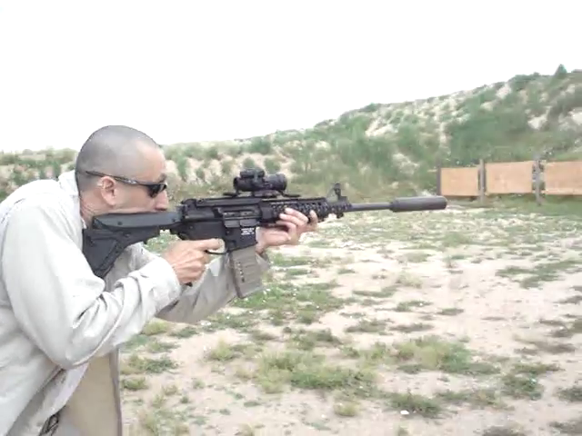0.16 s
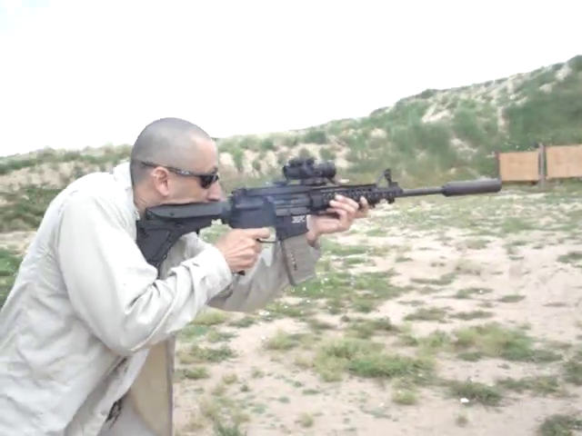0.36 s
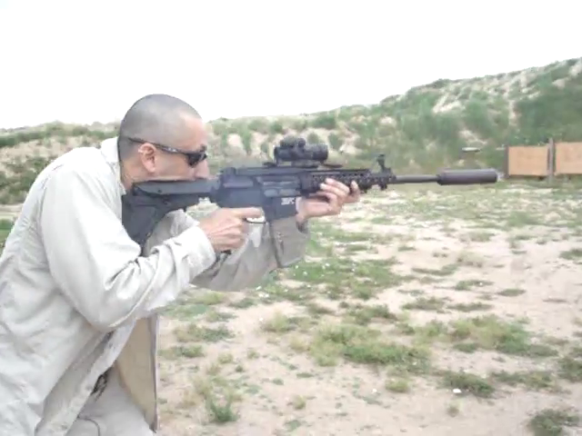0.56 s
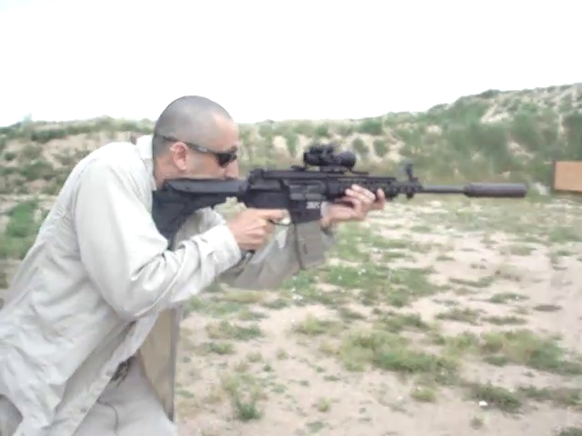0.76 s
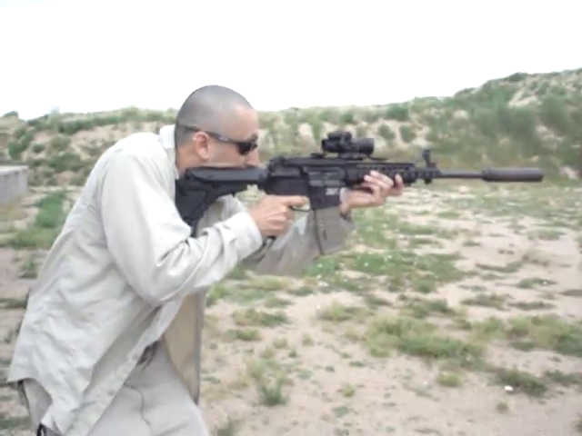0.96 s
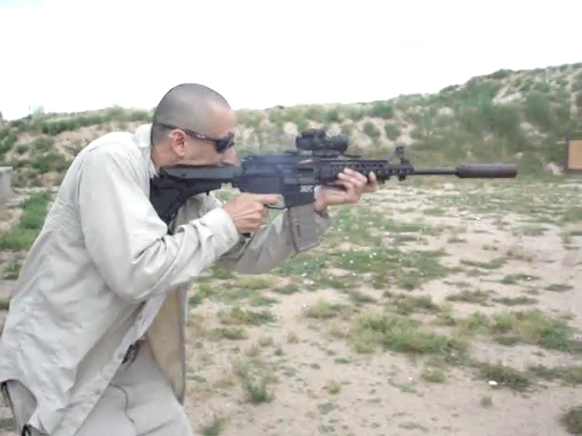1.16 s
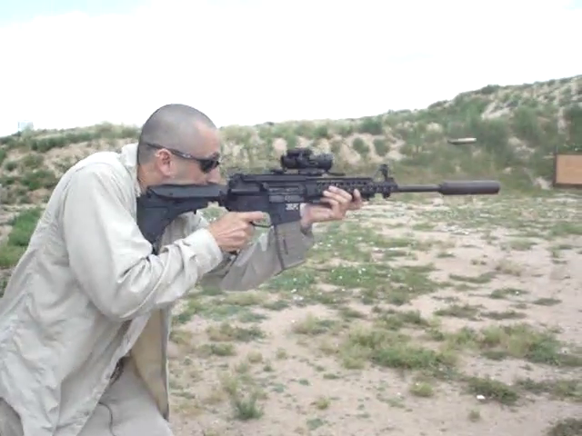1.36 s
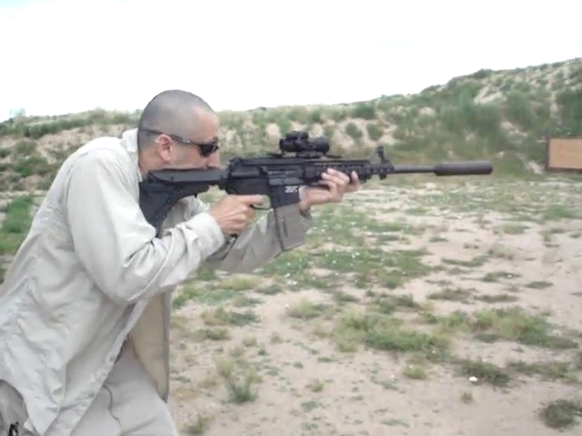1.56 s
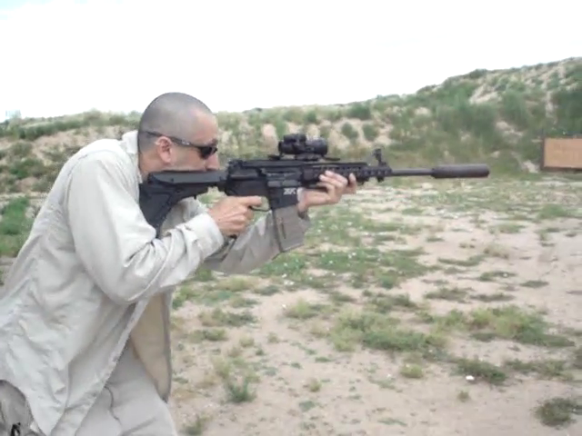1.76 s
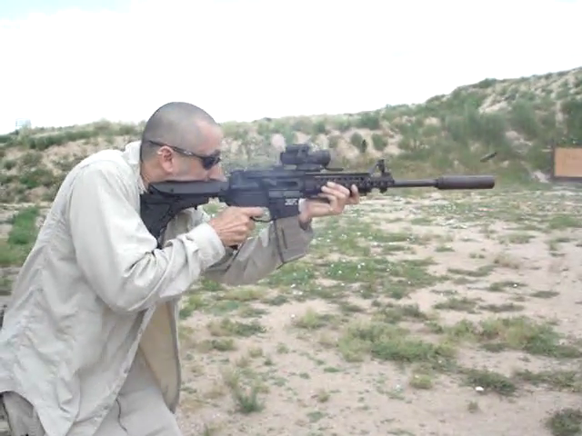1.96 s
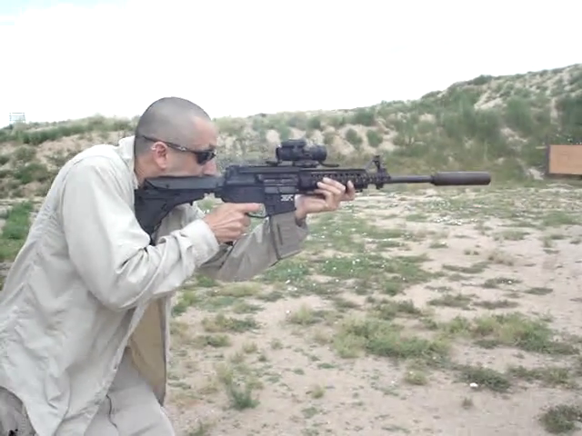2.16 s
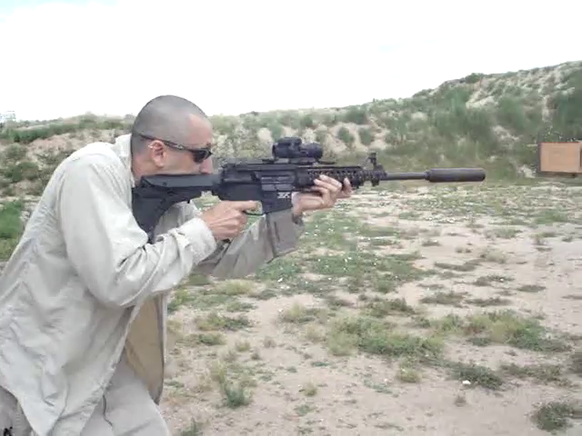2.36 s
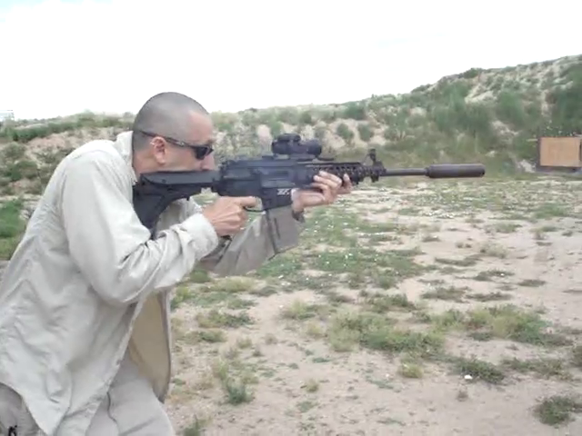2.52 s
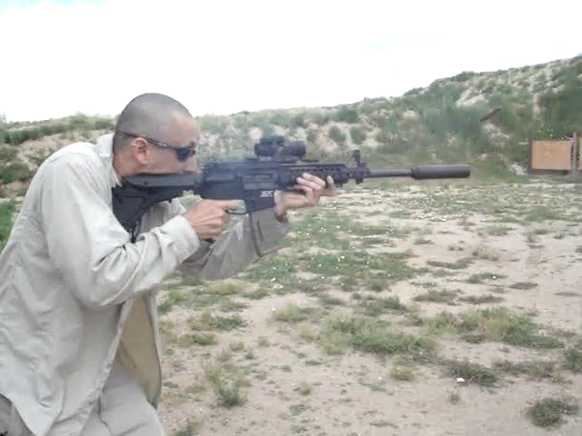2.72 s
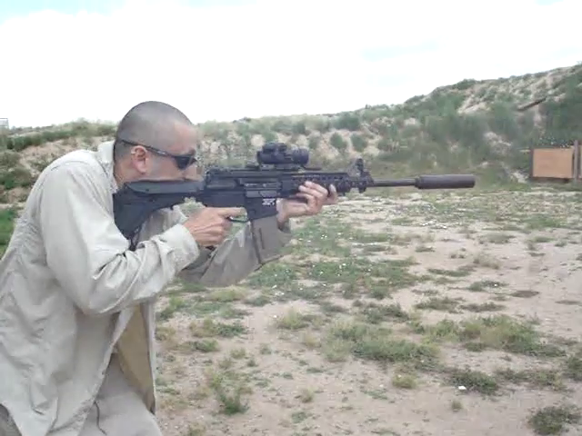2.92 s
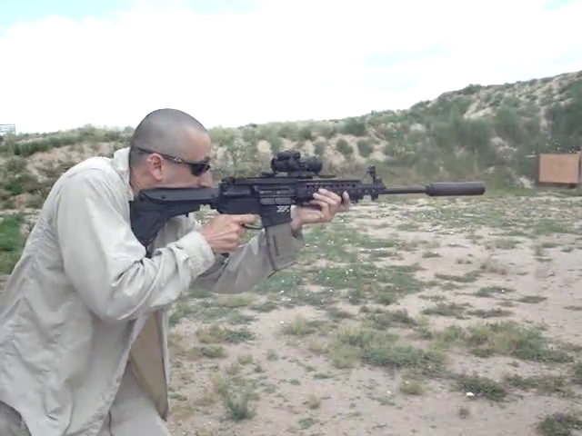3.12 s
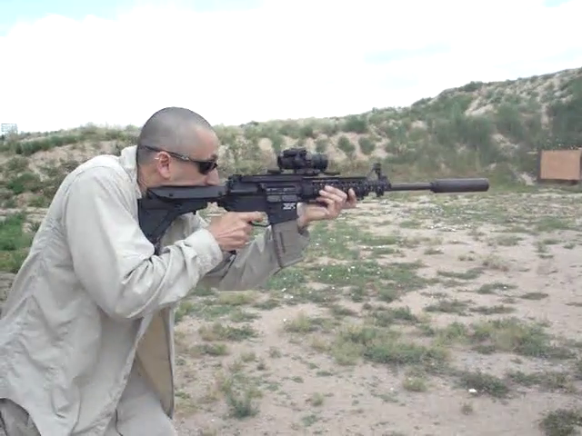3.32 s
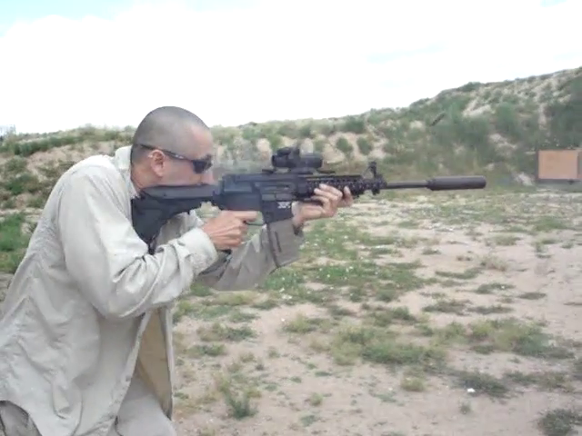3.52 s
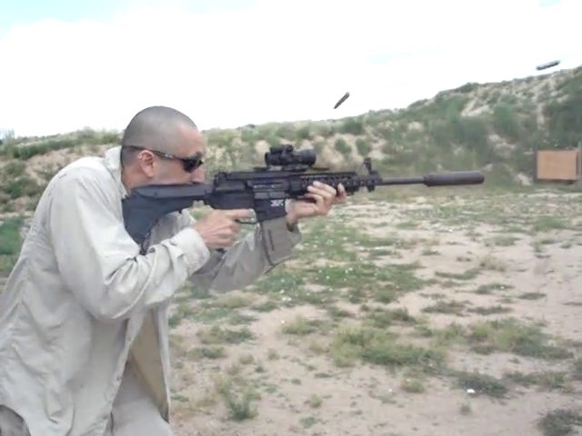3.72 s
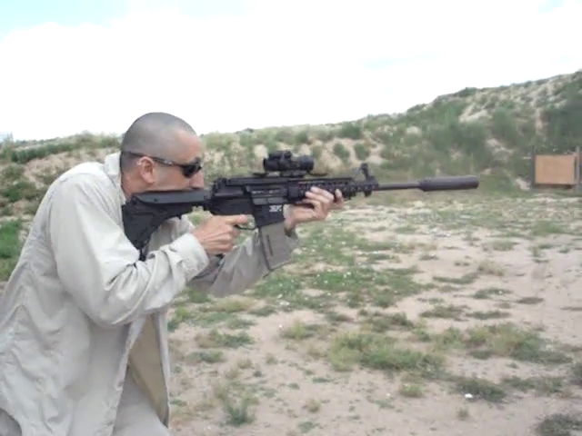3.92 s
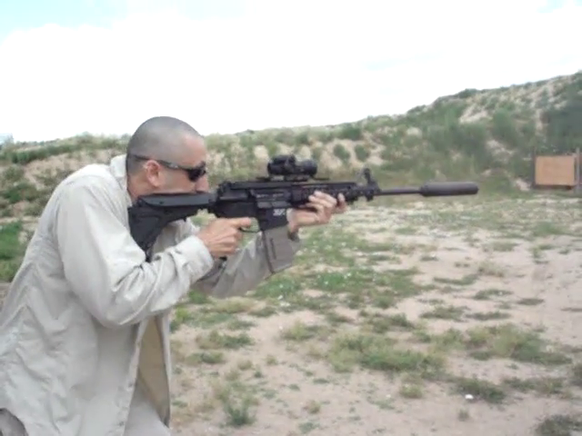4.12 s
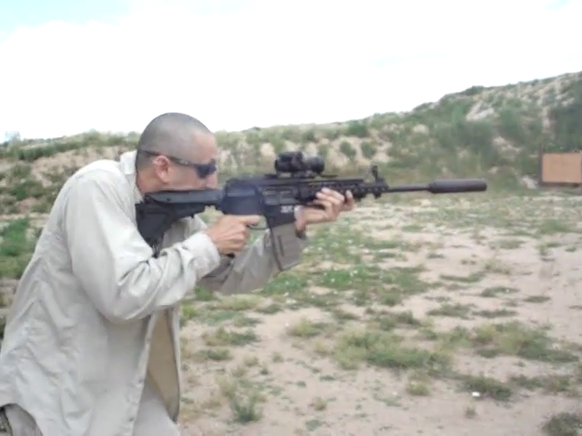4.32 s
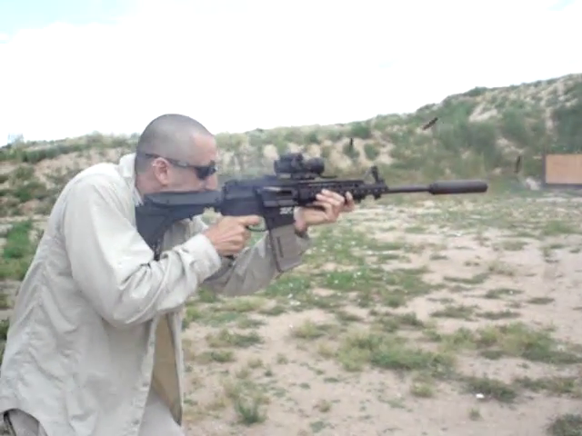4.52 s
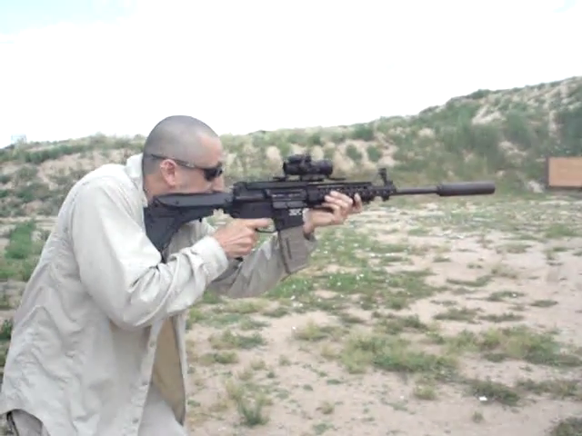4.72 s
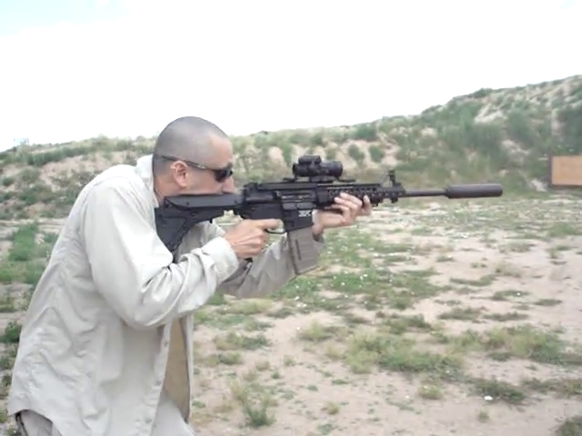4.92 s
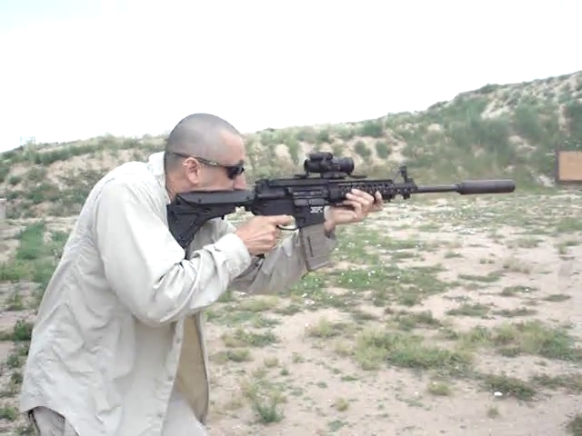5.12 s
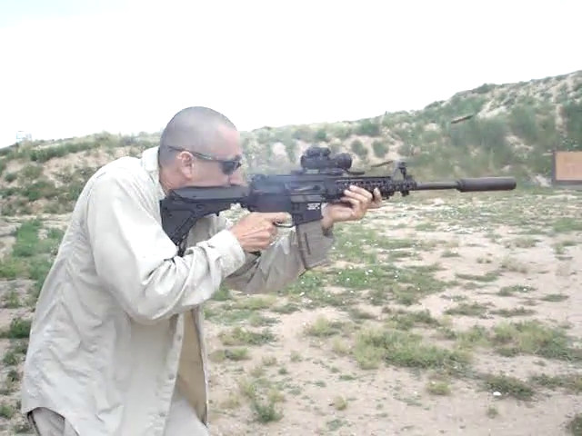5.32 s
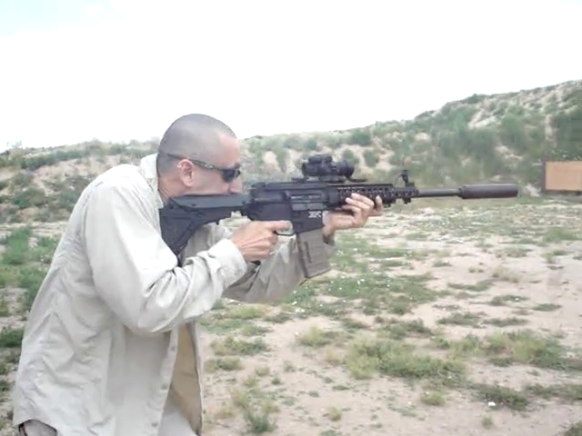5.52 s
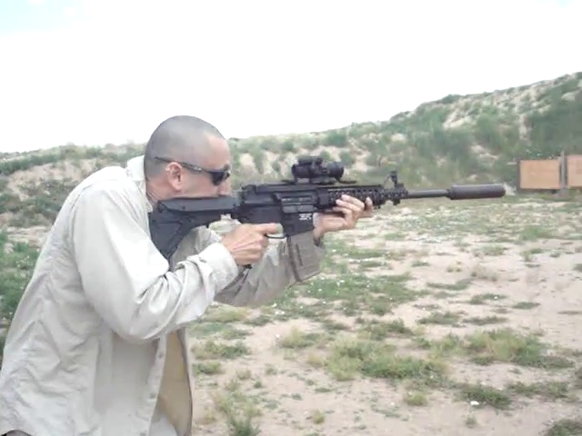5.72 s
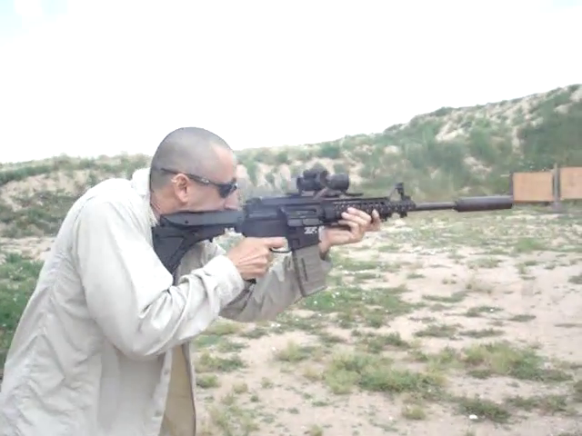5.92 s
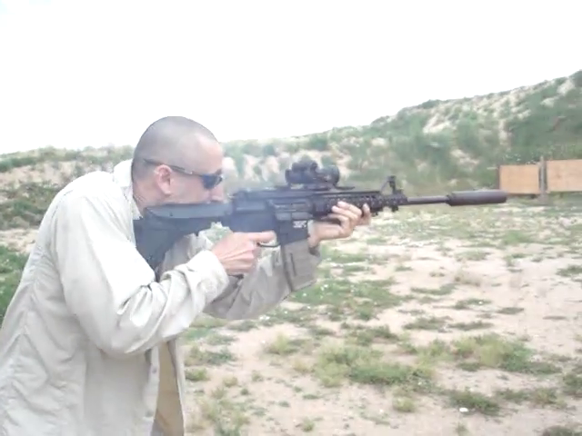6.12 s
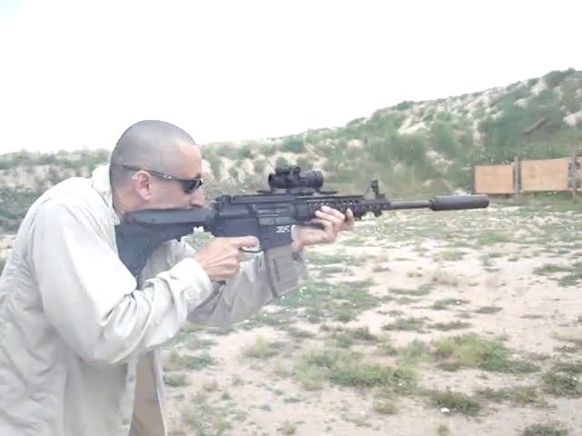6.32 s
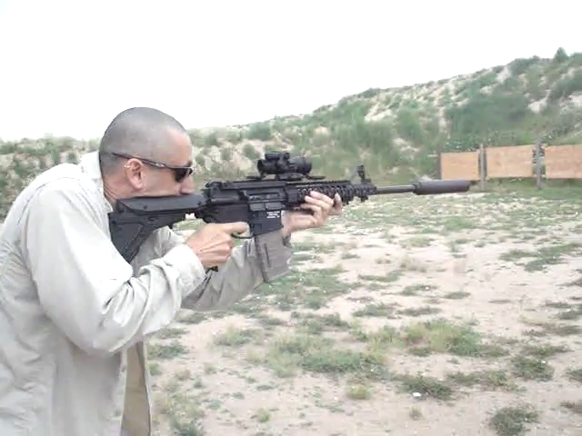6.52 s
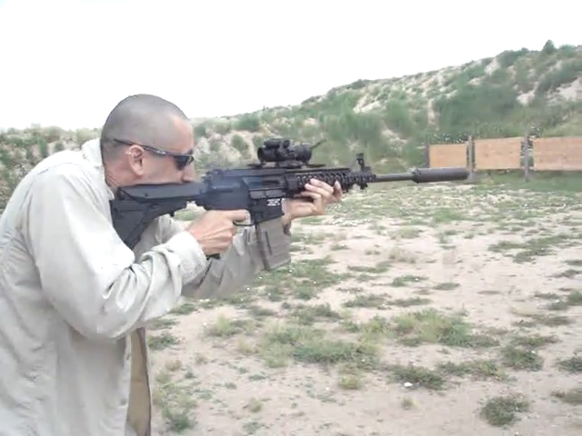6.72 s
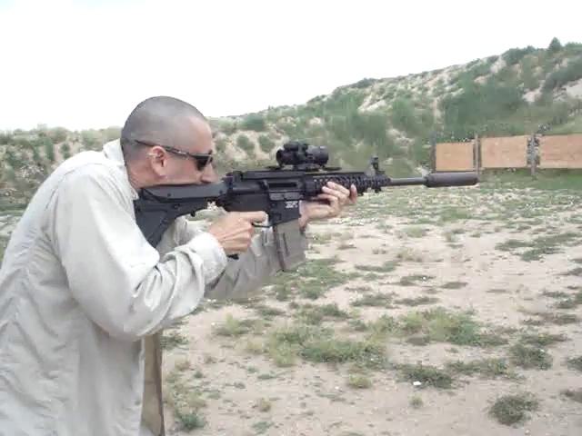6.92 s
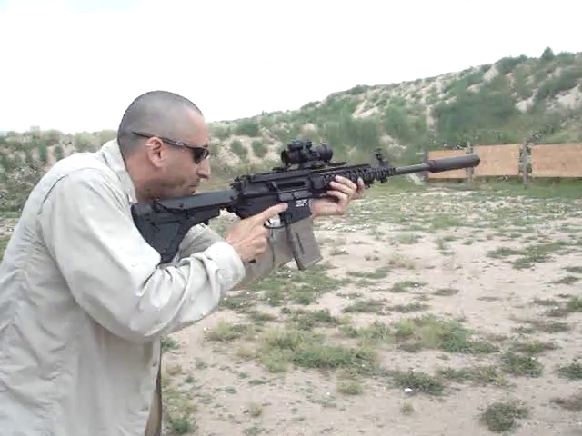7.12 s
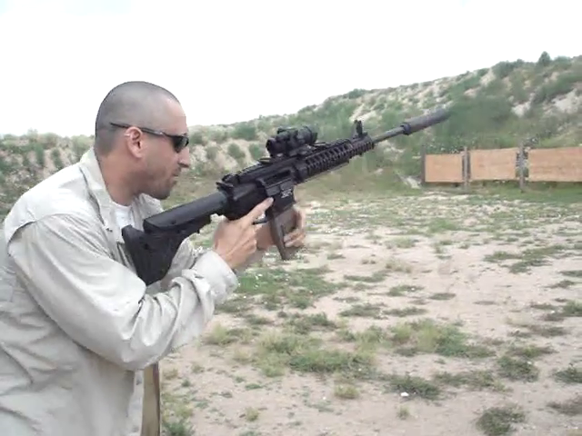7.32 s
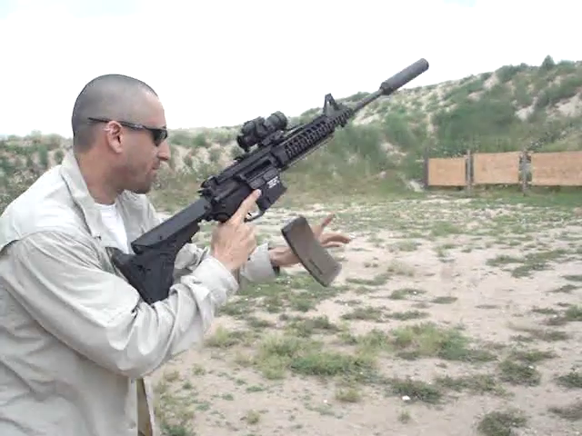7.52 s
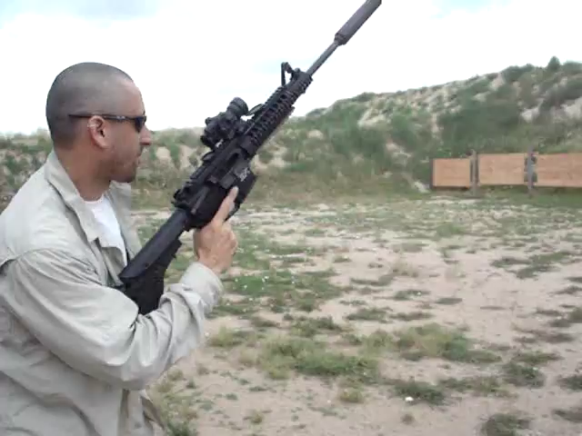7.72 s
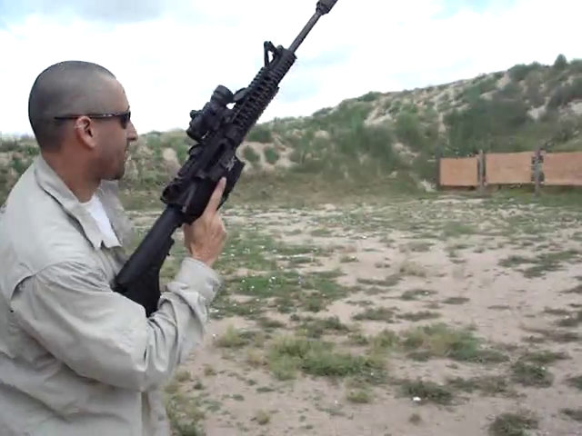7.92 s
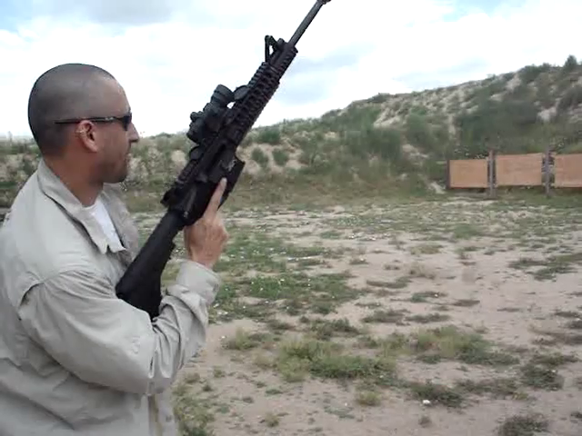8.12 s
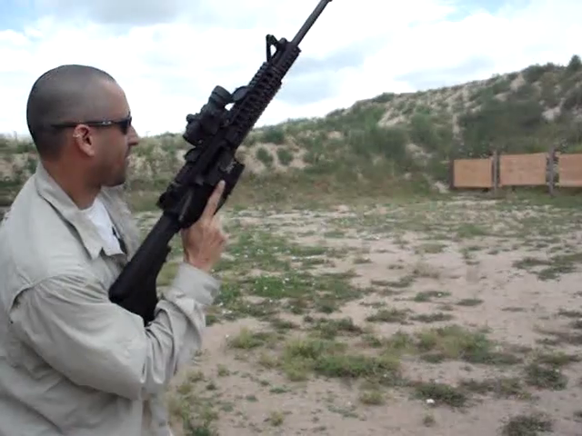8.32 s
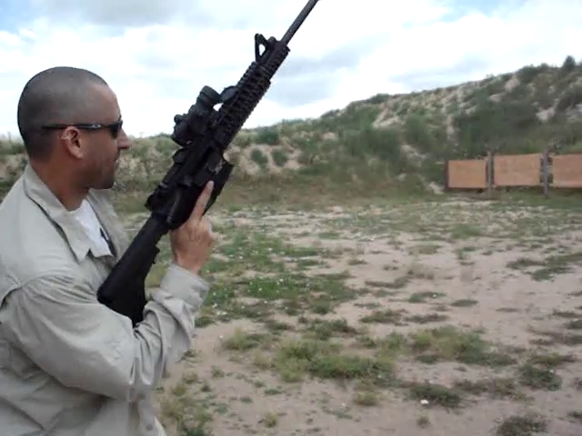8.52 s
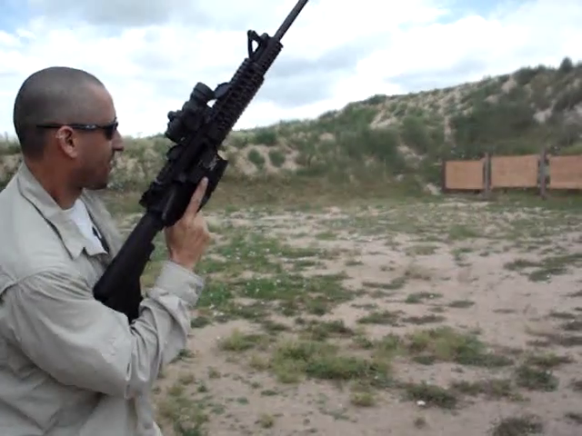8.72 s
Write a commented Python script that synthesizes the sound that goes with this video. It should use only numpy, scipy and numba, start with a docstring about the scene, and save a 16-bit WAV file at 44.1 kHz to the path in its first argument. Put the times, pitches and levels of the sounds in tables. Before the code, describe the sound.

Quick bursts of muffled but sharp rifle fire crack and echo off earth banks, followed by a loud metallic clack and wind buffeting.

```python
"""A suppressed automatic rifle on an open range with earth banks, heard from a few metres away. First the wind
stirs, gear rattles and the hammer clicks. Short bursts follow: each shot is wave packets and filtered gas
noise, then posts and boards return cracks, banks return scattered noise and the bolt slams home as a noise
burst. Between bursts a low rumble and rustle swell and cut off abruptly. After the last round the magazine
drops and a lever clacks (ringing modes, noise bursts), and gusts thump the microphone."""
import sys
import numpy as np
from scipy import signal
from scipy.fft import rfft, irfft
from scipy.io import wavfile
from scipy.ndimage import uniform_filter1d
from numba import njit

SR = 44100
rng = np.random.default_rng(int(sys.argv[2]) if len(sys.argv) > 2 else 0)


def store_pcm(level_fs):
    """Save levels as 16-bit WAV."""
    pcm = np.round(np.clip(level_fs, -1, 1) * 32767).astype(np.int16)
    wavfile.write(sys.argv[1], SR, np.atleast_2d(pcm).T)


def gain_from_db(level_db):
    """Convert decibel levels to linear amplitude factors (20 dB per decade)."""
    decades = np.asarray(level_db, float) / 20
    return 10 ** decades


N = 390726


def level(x, db):
    """Root-mean-square scaling: normalise to rms 1, then apply a level, constant or varying."""
    return x * gain_from_db(db) / np.sqrt(np.mean(x ** 2))


def band(x, hz, width):
    """Second-order resonance with unit gain at its centre."""
    return signal.lfilter(*signal.iirpeak(hz, hz / width, SR), x)


def coloured(points):
    """Spectral shaping: white noise weighted by a curve of (f/Hz, relative level/dB), rms 1."""
    hz, db = np.transpose(points)
    f = np.maximum(np.arange(N // 2 + 1) * SR / N, 1)
    weight = gain_from_db(np.interp(np.log(f), np.log(hz), db))
    return level(irfft(rfft(rng.standard_normal(N)) * weight, N), 0)


def drift(size):
    """Random modulation: a moving average of white noise over size samples, rms 1."""
    return level(uniform_filter1d(rng.standard_normal(N), size=size), 0)


def add(out, s, sound):
    """Superposition: mix a sound in at a time in seconds."""
    i = int(s * SR)
    out[i:i + len(sound)] += sound[:N - i]


def blip(hz, cycles, turn):
    """Gaussian wave packet of a few cycles, centred 10 ms in, envelope peak 1; turn is its phase."""
    t = np.arange(int(.02 * SR)) / SR - .01
    return np.exp(-(2.8 * t * hz / cycles) ** 2) * np.cos(2 * np.pi * (hz * t + turn))


def knock(hz, width, t60, rise):
    """Impact noise: a narrowed noise burst with exponential decay, peak 1."""
    t = np.arange(int((rise + t60) * SR)) / SR
    noise = band(band(rng.standard_normal(len(t)), hz, width), hz, width)
    y = noise * np.minimum(t / rise, 1) ** 2 * gain_from_db(-60 * np.maximum(t - rise, 0) / t60)
    return y / np.abs(y).max()


# spectrum of the steady hiss: (f/Hz, relative level/dB)
HISS_SPECTRUM = [(180, -58), (300, -22), (2710, -6), (2920, -5.5), (7570, -5.5), (10000, -8),
                 (13000, -38.5), (22000, -120)]


def hiss():
    """Stationary noise: a steady hiss of fixed spectrum."""
    return gain_from_db(-62.5) * coloured(HISS_SPECTRUM)


# course of the wind: (t/s, rumble level/dB, rustle level/dB)
WIND_COURSE = [(0, -60, -49), (.26, -55, -43), (.4, -51.5, -49), (.7, -73, -66), (1.1, -65.5, -64),
               (1.6, -87, -80), (7.37, -88, -84), (7.39, -69, -74), (8.0, -58, -66), (8.1, -51, -56),
               (8.5, -41, -58), (8.72, -45.5, -60), (8.86, -33, -46)]
# low swells between bursts that cut off abruptly: (cut-off t/s, rumble level/dB, rustle level/dB)
LULL_SWELLS = [(1.9, -86, -68), (2.32, -79.5, -75), (3.02, -75, -73), (3.29, -71, -64), (3.92, -71.5, -75),
               (4.21, -71, -64.5), (4.78, -72, -73), (5.07, -66, -63), (5.97, -71.5, -69), (6.53, -76, -72),
               (7.07, -68.5, -71.5)]


def layer_envelope(column, rise_db_s):
    """Envelope law: a noise layer follows the wind curve or whichever swell stands above it."""
    t = np.arange(N) / SR
    db = np.interp(t, [row[0] for row in WIND_COURSE], [row[column] for row in WIND_COURSE])
    for row in LULL_SWELLS:
        rise = rise_db_s * (t - row[0])
        cut = 15 * (row[0] - t) / .02  # falls 15 dB in 20 ms
        db = np.maximum(db, row[column] + np.minimum(rise, cut))
    return gain_from_db(db)


def wind():
    """A lumpy low rumble and a soft rustle, each noise under its own envelope: the wind and the swells between
    bursts."""
    smooth = uniform_filter1d(uniform_filter1d(rng.standard_normal(N), size=1500), size=1500)
    lumps = gain_from_db(3.0 * level(smooth, 0))
    rumble = coloured([(15, -7), (35, -5), (90, -4), (150, -9.5), (400, -20.5), (1000, -48)])
    rustle = coloured([(80, -16), (250, 2.5), (1200, -4), (3000, -11.5), (6000, -23.5)])
    out = layer_envelope(column=1, rise_db_s=35) * level(lumps * rumble, 0)
    return out + layer_envelope(column=2, rise_db_s=30) * rustle


# strongest gust thumps on the microphone: (t/s, packet peak level/dB before the low-pass, centre f/Hz)
GUST_THUMPS = [(8.11, -30.5, 230), (8.218, -27, 220), (8.356, -15, 510), (8.371, -18, 430),
               (8.393, -25, 255), (8.405, -26, 270), (8.489, -21, 340), (8.507, -21.5, 310),
               (8.512, -18.5, 260), (8.534, -26, 270), (8.571, -24, 320), (8.588, -22.5, 250),
               (8.6, -21, 240), (8.613, -25, 260), (8.641, -24, 240), (8.677, -28.5, 190),
               (8.743, -27.5, 200), (8.777, -22.5, 147), (8.824, -14, 210), (8.836, -6, 171),
               (8.851, -18, 160)]


def thumps():
    """Eddy impact: each eddy is a low wave packet with a faint higher one and a ragged noise wake."""
    out = np.zeros(N)
    first_s = 8.12  # weaker eddies come at random from here on
    eddies = []
    for when, size, pitch in rng.random(size=(28, 3)):
        eddies.append((first_s + (N / SR - first_s) * when, -32 - 9.0 * size, 200 * 1.8 ** (pitch - .5)))
    for s, db, hz in GUST_THUMPS + eddies:
        turn = rng.random()
        packet = blip(hz, 1.68, turn) + 0.16 * blip(2.26 * hz, 2.6, turn)
        add(out, s - .01, gain_from_db(db) * packet)
        wake = knock(.9 * hz, 1.7 * hz, .06, 0.005)
        add(out, s - .004, gain_from_db(db - 8.0) * wake)
    return signal.sosfilt(signal.butter(2, 1100, fs=SR, output="sos"), out)


# rattles of sling, magazine and lever: (t/s, centre f/Hz, filter width/Hz, peak level/dB, t60/s)
GEAR_RATTLES = [(0.054, 880, 810, -43, .036), (.062, 1000, 900, -40, .04), (.07, 1153, 400, -47.5, .27),
                (.325, 1296, 1700, -57, .089), (3.401, 1500, 2520, -57, .02), (7.385, 2500, 3990, -49, .2),
                (7.394, 1220, 400, -41.5, .12), (7.421, 1250, 400, -44, .08), (7.431, 1200, 500, -42, .12),
                (7.437, 2500, 4000, -41, .06), (7.444, 1900, 2000, -41, .04),
                (7.488, 2000, 2970, -40, .046), (7.528, 1300, 600, -50, .25), (7.562, 2200, 2500, -49, .12),
                (7.83, 700, 905, -49, .18), (7.982, 2970, 4980, -15.5, .085),
                (7.999, 3350, 6000, -12.5, .068), (8.005, 1500, 1300, -25, .18),
                (8.167, 2000, 5000, -40.5, .11), (8.199, 3000, 6000, -33.5, .092)]


def rattles():
    """Impact noise of loose gear: band-limited bursts with individual decay times."""
    out = np.zeros(N)
    for s, hz, width, db, t60 in GEAR_RATTLES:
        add(out, s, gain_from_db(db) * knock(hz, width, t60, 0.019 * t60))
    return out


# modes of the rifle: (nominal f/Hz, relative level/dB at full hardness, t60/s)
RIFLE_MODES = [(720, -10, .03), (1020, -18.5, .035), (1200, 4.5, .03), (1320, -9.5, .06), (2420, -1.5, .04),
               (2930, -9.5, 0.049), (3670, -13, .04), (5000, -14, 0.035), (6450, -17.5, .04)]


def ring(hardness):
    """Modal superposition: decaying sines after a blow; a soft blow leaves the high modes quiet."""
    t = np.arange(int(.2 * SR)) / SR
    y = np.zeros(len(t))
    for hz, db, t60 in RIFLE_MODES:
        softening = 9.0 * (1 - hardness) * np.log2(hz / 1200)
        detune = 1 + 0.056 * rng.standard_normal()
        y += gain_from_db(db - softening - 60 * t / t60) * np.sin(2 * np.pi * hz * t * detune)
    y = y * np.minimum(t / 0.00036, 1)
    return y / np.abs(y).max()


# blows that ring the rifle: (t/s, peak level/dB, hardness 0-1)
RIFLE_BLOWS = [(0.054, -48, 0), (.062, -32, .2), (.111, -50.5, 0), (.325, -51.5, 0), (7.488, -45, .5),
               (7.541, -52, .4), (7.982, -23.5, .6), (7.999, -11, 1), (8.199, -38.5, .5)]


def blows():
    """Impulsive excitation: every blow sets the rifle's modes ringing."""
    out = np.zeros(N)
    for s, db, hardness in RIFLE_BLOWS:
        add(out, s, gain_from_db(db) * ring(hardness))
    return out


# trigger and hammer at the start of a burst: (t/s, peak level/dB)
HAMMER_CLICKS = [(0.3716, -36), (0.396, -27), (1.12, -35), (1.903, -31.5), (2.608, -41.5), (5.990, -38)]
# shots: (t/s, shot level/dB, peak level/dB of the bolt slamming home); the last leaves the bolt open
SHOT_TIMES = [(0.4072, -14.5, -25), (0.4783, -13.5, -8), (0.5492, -10, -10.5), (1.1285, -13.2, -8),
              (1.201, -15.5, -5.5), (1.2877, -15.5, -14), (1.9129, -16, -10), (1.9832, -17.5, -14),
              (2.052, -16.5, -17.5), (2.6186, -15, -11), (2.6879, -18, -11), (2.7566, -18.5, -20),
              (2.825, -18, -14), (3.497, -15, -10.5), (3.57, -16.5, -17), (3.639, -16, -13),
              (3.7055, -17, -14), (4.387, -15.5, -9.5), (4.4514, -17.5, -9.5), (4.5171, -19.5, -24),
              (4.5854, -17, -13.5), (5.2392, -16.5, -10), (5.3027, -17, -19), (5.3684, -14.5, -15),
              (5.4319, -17.5, -14), (6.0, -17.5, -11.5), (6.063, -16.5, -9), (6.1258, -17.5, -13),
              (6.1879, -18.5, -15), (6.249, -17.5, -11.5), (6.7748, -15.5)]


def bolt_and_hammer():
    """Impact of steel on steel: short bright noise bursts for bolt, trigger and hammer."""
    out = np.zeros(N)
    strikes = list(HAMMER_CLICKS)
    for (s, _, db), (after, *_) in zip(SHOT_TIMES, SHOT_TIMES[1:]):
        if after - s < .2:
            closing = after - .0111  # within a burst: this many seconds before the next shot
        else:
            closing = s + .0635 - .0021 * s  # end of a burst: travel shortens as the action warms
        strikes.append((closing, db))
    for s, db in strikes:
        add(out, s - .0015, gain_from_db(db) * knock(4000, 5700, 0.0071, .0025))
    return out


def per_shot(shape, lead):
    """Incoherent addition: the powers of all shots' envelopes sum; lead (s) starts each one early."""
    power = np.zeros(N)
    for s, db, *_ in SHOT_TIMES:
        add(power, s - lead, (gain_from_db(db) * shape) ** 2)
    return np.sqrt(power)


def rolling_wash():
    """Diffuse reverberation: the lows roll round the banks as a smooth decaying wash."""
    t = np.arange(int(.5 * SR)) / SR
    shape = np.minimum(t / 0.068, 1) * gain_from_db(-60 * t / 0.26)
    lows = coloured([(60, -22.5), (250, 0), (700, -8), (1600, -5.5), (3000, -32)])
    return per_shot(shape, 0) * level(lows, -26.5)


# scattered return from ground and banks: (lag t/s, level/dB re shot)
BANK_RETURN = [(0, -25), (0.029, -31), (0.073, -22), (.12, -22), (.19, -29), (.23, -40.5), (0.299, -42),
               (0.316, -55), (.4, -79)]
# spectrum of that return: (f/Hz, relative level/dB)
BANK_SPECTRUM = [(59, -42.5), (100, -22.5), (257, -12), (786, -14.5), (2500, -3), (3600, -2), (7350, -14.5),
                 (10000, -35.5), (13000, -49), (22000, -120)]


def bank_scatter():
    """Diffuse scattering: many small reflectors return grainy noise."""
    lag, db = np.transpose(BANK_RETURN)
    shape = gain_from_db(np.interp(np.arange(int(lag[-1] * SR)) / SR, lag, db))
    grain = gain_from_db(4.0 * drift(130))
    return per_shot(shape, 0) * level(grain * coloured(BANK_SPECTRUM), 0)


# cracks from posts and boards: (lag t/s, mean level/dB re shot, mean centre f/Hz, packet length/cycles)
POST_CRACKS = [(.078, -9, 4948, 5.5), (0.0808, -1.5, 3500, 2.5), (0.0895, 3, 4253, 2.5),
               (0.1005, 2, 4030, 1.1), (.111, -6.5, 3045, 2.5), (.113, -22, 241, 1.5),
               (.123, -13, 3103, 2.4), (.135, -15.5, 3005, 3.2), (.149, -11, 3070, 2.7),
               (.1627, -4.5, 3300, 2.3), (.228, -26, 3200, 2.2), (0.236, -23, 3290, 1.2),
               (.246, -24.5, 3250, 2.2), (.2757, -23.5, 3780, 1.8), (0.303, -26, 3230, 1.4)]


def cracks():
    """Discrete reflection: posts and boards return wave packets at the same lags after every shot."""
    out = np.zeros(N)
    for s, db, *_ in SHOT_TIMES:
        for lag, crack_db, hz, cycles in POST_CRACKS:
            louder, higher, turn = rng.standard_normal(3)
            crack = blip(hz * (1 + .1 * higher), cycles, turn)
            add(out, s + lag - .01, gain_from_db(db + crack_db + 1.7 * louder) * crack)
    return out


def clatter():
    """Random impacts: carrier, spring and spent case give nine packets a shot, fading with delay."""
    out = np.zeros(N)
    for s, db, *_ in SHOT_TIMES:
        for late, pitch, size, turn in rng.random((9, 4)):
            gain = gain_from_db(db - 3.0 - 11 * late - 9 * size)
            add(out, s + .045 * late, gain * blip(1200 * 4.5 ** pitch, 3.5, turn))
    return out


# gas jet bands: (centre f/Hz, width/Hz of each filter pass, mean level/dB re shot, hold t/s, t60/s)
GAS_BANDS = [(300.6, 140, -23, 0.006, 0.022), (1020, 830, -10.5, 0.0034, 0.1),
             (2000, 1700, -6.5, 0.0093, 0.079), (3170, 3300, -4, 0.0082, 0.025),
             (4450, 2800, -3, 0.0083, 0.049), (6940, 3000, -5, .008, 0.03), (9300, 600, -15, 0.0027, 0.018),
             (6340, 7600, -36, 0.06, .08)]


def gas_jet():
    """Jet noise: each band rises fast, holds, then decays at its own rate while sputtering a little."""
    out, lead = np.zeros(N), .005
    t = np.arange(int(.2 * SR)) / SR - lead
    for hz, width, db, hold, t60 in GAS_BANDS:
        sputter = 3.0 * drift(120) + 1.5 * drift(2000)  # dB
        shape = gain_from_db(np.minimum(6000 * t, 0) - 60 * np.maximum(t - hold, 0) / t60)
        noise = band(band(rng.standard_normal(N), hz, width), hz, width)
        out += per_shot(shape, lead) * level(noise, db + sputter)
    return out


# pops of one shot, direct and bounced close by:
# (lag t/s, mean centre f/Hz, packet length/cycles, mean level/dB re shot)
MUZZLE_POPS = [(0, 683.3, 2.2, 5.5), (-.0003, 3300, 1.8, 18.5), (0, 257.8, 1.3, -12.5),
               (.003, 105, 1.0, -17.5), (.0055, 280.3, 0.68, -11), (.007, 670, 2, -1),
               (.0085, 2400, 1.6, 14.5), (.0175, 2000, 2.5, -3), (.023, 650, 1.5, -18.5),
               (.029, 658, 1.5, -13.5)]


def pops():
    """Impulsive radiation: superposed wave packets that barely change from shot to shot."""
    out = np.zeros(N)
    for s, db, *_ in SHOT_TIMES:
        for lag, hz, cycles, pop_db in MUZZLE_POPS:
            louder, higher = rng.standard_normal(2)
            pop = blip(hz * (1 + 0.058 * higher), cycles, .3)
            add(out, s + lag - .01, gain_from_db(db + pop_db + 1.3 * louder) * pop)
    return out


def scene():
    """Linear superposition of the rifle, its gear and its echoes at the microphone."""
    gear = rattles() + blows() + bolt_and_hammer()
    echoes = rolling_wash() + bank_scatter() + cracks()
    return (gear + echoes + clatter() + gas_jet() + pops())[None]


@njit
def follow(x, attack, release):
    """Envelope detection: first-order smoothing of |x| with separate rates up and down."""
    y, e = np.empty(len(x)), 0.
    for i in range(len(x)):
        e += (abs(x[i]) - e) * (attack if abs(x[i]) > e else release)
        y[i] = e
    return y


def roll_off(x):
    """The treble ends steeply here."""
    return signal.sosfilt(signal.butter(12, 11330, fs=SR, output="sos"), x)


def record(dry):
    """Dynamic compression: gain starts high and backs off late; a quick limiter holds the peaks."""
    x = dry[0]
    heard = follow(x, 1 / (.55 * SR), 1 / (40 * SR))
    late = np.interp(np.arange(N) - .062 * SR, np.arange(N), heard)  # 62 ms behind
    x = x * np.clip(gain_from_db(-36) / (late + 1e-9), 1, gain_from_db(25.5))
    loud = follow(np.roll(x, -20), 1 / (.0006 * SR), 1 / (0.0062 * SR))  # looks 20 samples ahead
    squeeze = np.maximum(loud / gain_from_db(-9), 1)
    x = x / squeeze
    x = x + gain_from_db(-34) * band(np.log(squeeze), 30, 90)  # the limiter's jolt leaks through as a deep thump
    x = np.tanh(1.084 * x) / 0.8  # soft saturation
    x = x + wind() + thumps() + hiss()
    x = signal.sosfilt(signal.ellip(10, .2, 65, 10050, fs=SR, output="sos"), x)  # steep low-pass
    x = x / max(1, np.abs(x).max() / .97)  # peaks stay under full scale
    return roll_off(x[None])


dry = scene()
out = record(dry)
store_pcm(out)
```